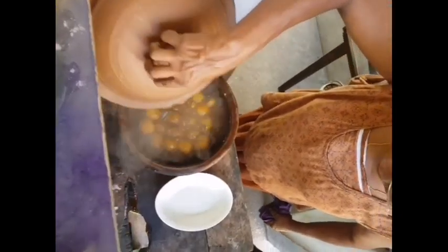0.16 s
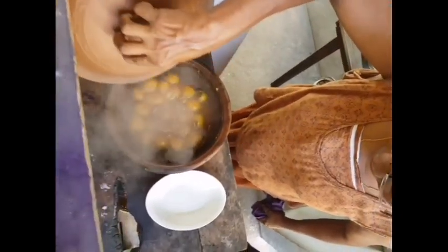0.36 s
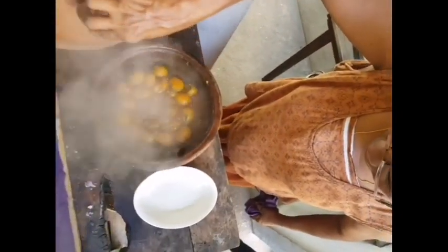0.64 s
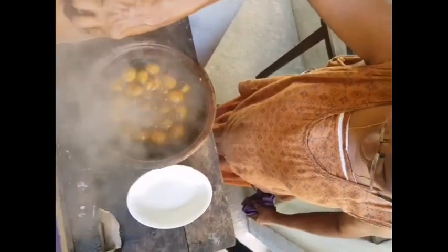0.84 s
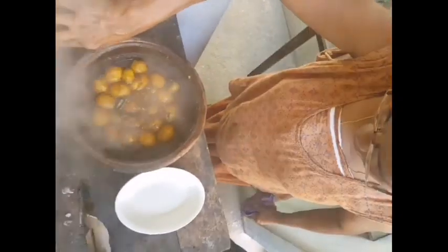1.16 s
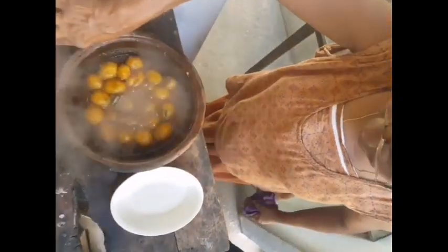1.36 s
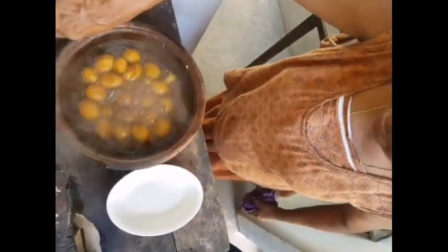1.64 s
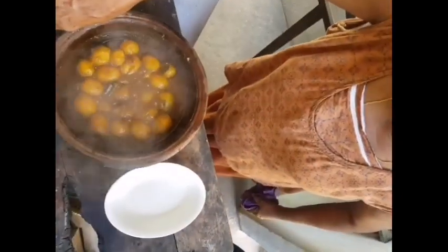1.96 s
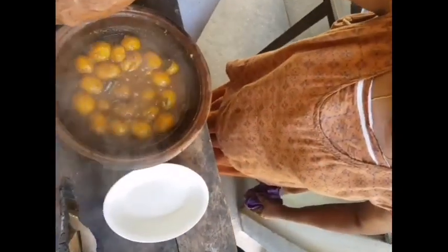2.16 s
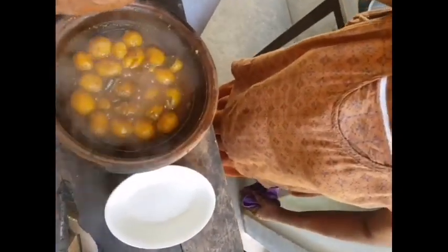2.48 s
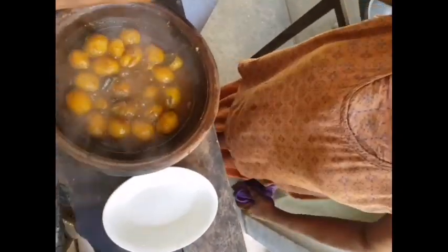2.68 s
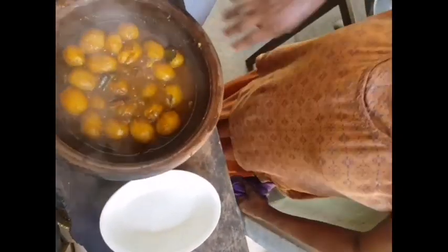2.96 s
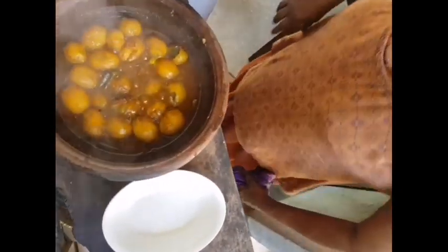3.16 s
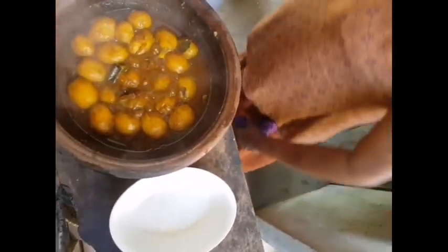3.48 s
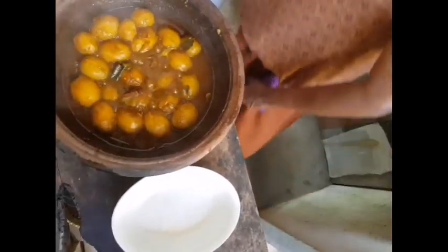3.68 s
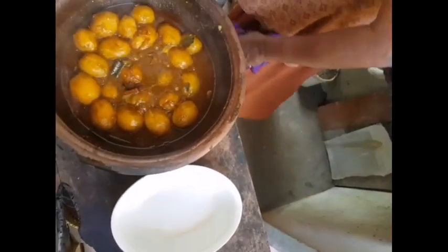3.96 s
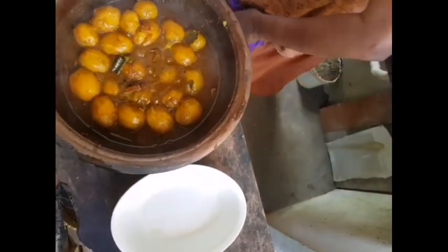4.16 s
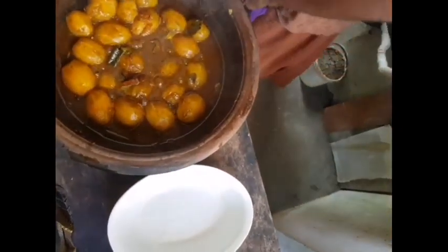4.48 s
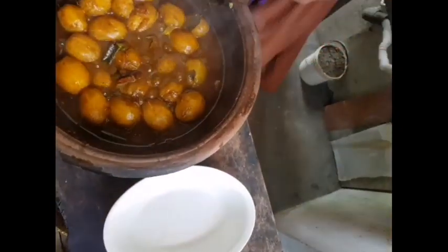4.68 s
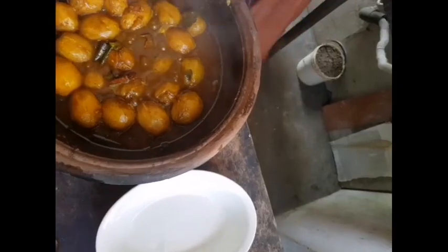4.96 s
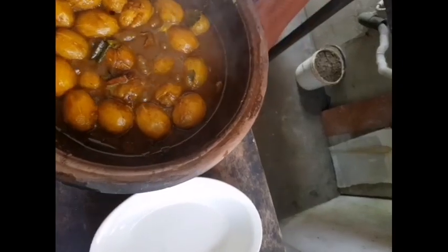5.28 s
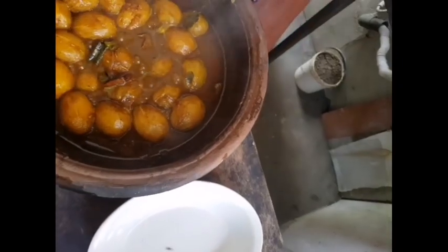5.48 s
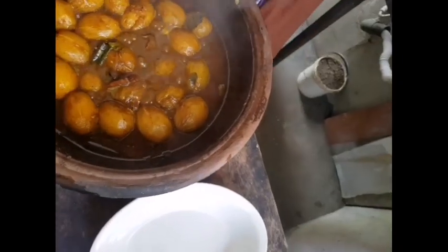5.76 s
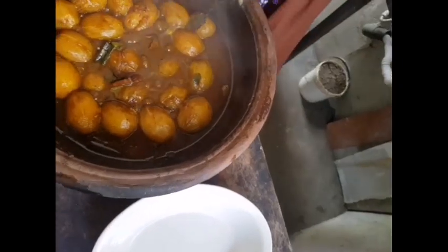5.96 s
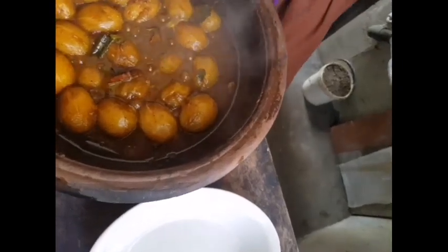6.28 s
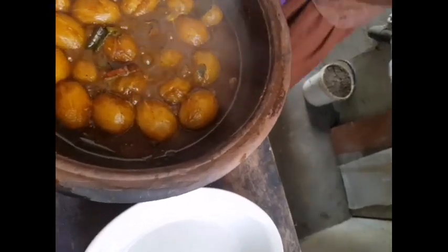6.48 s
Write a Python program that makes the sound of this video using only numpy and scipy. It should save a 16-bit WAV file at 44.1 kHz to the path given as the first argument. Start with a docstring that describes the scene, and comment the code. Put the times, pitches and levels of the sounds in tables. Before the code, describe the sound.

Close stereo beside a pot in an open-sided kitchen, with soft outdoor air and a thin, steady insect drone. Low handling rumble starts and fades; curry fizzes faintly, with small bird whistles at 0.3-0.7 s and grainy hiss swelling. From 0.9 s a heavy clay lid makes quick light knocks, then gritty, juddering drags. A strong hollow knock comes at 1.3 s, lesser ones at 1.5 and 1.6 s, a growing scrape near 1.9 s, and the loudest, deepest flat thud at 2.1 s, with a small afterknock at 2.3 s. Then it is quiet: fine ticking, soft glugs and brief dry rubs, notably at 4.3 and 5.6 s. Hoarse, echoing crows caw at 2.4, 3.0 and 5.9 s; a falling whistle sounds at 3.7 s, more small birds at 4.7-5.6 s. Spits grow crisp and frequent from 4.8 s, sharpest around 5.8-6.6 s, with a plop near the end.

```python
"""Clay lid and simmering curry

An open-sided kitchen, stereo, close on the pot: its clay lid comes off and is set down on a ledge. Decaying
modes and noise make the knocks, juddering noise the drags; a heavy blow drops the lid flat, with one light
knock after it. The curry is fizzing noise, short spitting bursts and sines of rising pitch; brushes pass as
bands of noise. Outside, hoarse harmonic crows and smaller, buzzing whistles sound over shaped noise: air and
insects."""
import sys
import numpy as np
from scipy import signal
from scipy.fft import rfft, irfft
from scipy.io import wavfile

SR = 44100
rng = np.random.default_rng(int(sys.argv[2]) if len(sys.argv) > 2 else 0)


def store_pcm(level_fs):
    """Save levels as 16-bit WAV."""
    pcm = np.round(np.clip(level_fs, -1, 1) * 32767).astype(np.int16)
    wavfile.write(sys.argv[1], SR, np.atleast_2d(pcm).T)


N = 291942
TIME = np.arange(N) / SR
BINS = np.maximum(np.fft.rfftfreq(N, 1 / SR), 1)

# Lid knocking on the ledge: (time [s], level [dB], then relative to it: lid's boom [dB],
# deep bass [dB], clay ring [dB], gritty crack [dB])
LID_KNOCKS = [(0.891, -24.5, -0.5, -27, -15, -37), (0.943, -23.5, 2, -33, -18, -25),
              (1.054, -32.5, 3.5, -32, -26, -17), (1.11, -35.5, 3.5, -39, -11, -30),
              (1.296, -11, -9, -17, -21.5, -18.5), (1.523, -21, -18, -11, -21.5, -23),
              (1.642, -24, -12, -10, -26, -36.5), (2.097, -5, -4.5, -6, -2, -35),
              (2.337, -29.5, -11, -9.5, -20, -15)]
# Modes of the ledge under the lid: (frequency [Hz], level [dB], t60 [s])
LEDGE_MODES = [(78, -8.5, 0.29), (108.5, 4, 0.12), (145, -7, 0.2), (180, -14, 0.11), (241.6, -3, 0.18),
               (273, 2, 0.084), (356, -7, 0.18), (530, -12.5, 0.05)]
# Modes of the lid's own ring: (frequency [Hz], level [dB], t60 [s])
CLAY_MODES = [(585, -8, .13), (685, -7, .16), (756, -4, .16), (830, -5, .2), (926, -5, .2), (1014, -6, .16),
              (1074, -4, .2), (1167, -3, .17), (1248, -4, .17), (1319, -10, .2), (1417, -1, .17),
              (1471, -4, .16), (1519, -3, .19), (1663, -5, .19), (1900, -3, .14), (2073, -13, .16),
              (2406, -8, .13), (2498, -4, .14), (2755, -8, .1), (3160, -13, .11), (3243, -14, .11)]
# Colour of crushed grit: (frequency [Hz], level [dB])
GRIT_COLOUR = [(450, 1.5), (1500, -16.5), (2100, 2.5), (2500, 6.5), (2800, -5), (3100, 9), (3400, -5),
               (3700, 5.5), (4400, -3), (6000, -5.5), (7500, -22), (10000, -19), (15000, -26)]
# Colour of the lid's dull rattle: (frequency [Hz], level [dB])
CLAY_COLOUR = [(300, -3.5), (480, -10), (620, 1), (900, -1), (1150, 7), (1550, -5), (1800, -1.5),
               (2000, -10), (2200, -12), (2500, -17), (2800, -15), (3100, -20), (3700, -24), (7000, -43)]
# Colour of the shaken ledge: (frequency [Hz], level [dB])
RUMBLE_COLOUR = [(30, -21), (95, -7), (135, -8), (185, -1.5), (210, -1), (235, -2.5), (350, -7.5),
                 (460, -16), (900, -32), (4000, -82)]
# Lid sliding between knocks: (start [s], length [s], grit level [dB], clay body level [dB],
# rumble level [dB], growth from start to end [dB])
LID_SLIDES = [(0.891, 0.42, -58, -51.5, -49.5, 7), (1.308, 0.443, -64.5, -57.5, -45, 1),
              (1.778, 0.108, -80, -61, -53, 6), (1.898, 0.119, -51, -54, -40.5, 11),
              (2.021, 0.071, -40.5, -48, -33, -4.5)]
# Colour of fizz and hiss: (frequency [Hz], level [dB])
FIZZ_COLOUR = [(1000, -18.5), (3000, -4.5), (5000, -5), (7200, -6), (8700, 0), (11000, -4), (13500, -9),
               (16000, -27)]
# Loudest bubbles spitting: (time [s], level [dB])
CURRY_SPITS = [(0.138, -43.5), (0.839, -47), (1.6762, -40), (2.7576, -51), (3.217, -46), (4.75, -45),
               (4.916, -46), (5.0558, -44.5), (5.1637, -45.5), (5.276, -46.5), (5.375, -42),
               (5.8312, -35.5), (6.0173, -36), (6.1873, -42), (6.3225, -40), (6.3924, -33.5),
               (6.573, -36.5)]
# Thick bubbles and light taps: (time [s], level [dB], pitch [Hz])
CURRY_PLOPS = [(2.681, -41, 1750), (3.819, -45, 2930), (4.591, -44, 1080), (4.628, -47, 1170),
               (5.05, -46, 457), (5.171, -43, 960), (5.409, -43, 800), (5.439, -46, 1000),
               (6.56, -37, 1980)]
# Bright hiss swells: (time of the top [s], level [dB], time per 20 dB [s]);
# a positive time is that of the sinking, a negative one that of the rise
HISS_SWELLS = [(0.55, -57.5, 0.08), (0.735, -58, 0.25), (1.29, -50, -0.02), (1.54, -55, 0.13),
               (1.77, -48.5, 0.22), (2.503, -48.5, 0.09), (4.075, -59.5, -0.38)]
# Brushes and scuffs: (time [s], length [s], rub level [dB], rub centre [Hz], rub width [octaves],
# dull body level [dB], hiss level [dB])
CLOTH_SCUFFS = [(1.708, 0.13, -52.5, 2950, .26, -70, -68), (2.336, 0.084, -55.5, 3840, 1.3, -60, -62),
                (2.864, 0.093, -56.5, 3570, 0.62, -74, -59.5), (3.379, 0.32, -63, 2420, 1.0, -63, -60),
                (3.878, 0.1, -59.5, 4000, 0.92, -67, -67), (4.06, 0.073, -52, 2400, 1.5, -56, -63),
                (4.337, 0.048, -46, 4500, 0.2, -48.5, -48.5), (4.39, 0.16, -53.5, 3880, 0.96, -57, -56.5),
                (5.519, .089, -54.5, 1750, 1.4, -68, -60.5), (5.649, 0.066, -45, 2480, 0.52, -46.5, -84),
                (6.406, 0.032, -53.5, 2830, 0.97, -67, -68), (6.557, 0.03, -46, 2220, .42, -65, -74)]
# Crows: (time [s], length [s], level [dB], top pitch [Hz])
CROW_CAWS = [(2.417, 0.3, -43, 701), (3.01, 0.25, -44, 673.6), (5.869, 0.3016, -44, 657.4)]
# Overtones of a caw: (multiple of the pitch [1], level [dB])
CROW_PARTIALS = [(1, -2), (2, -12.5), (3, -19.5), (4, -29.5)]
# Smaller birds: (time [s], length [s], level [dB], top pitch [Hz], last pitch [Hz], buzz depth [rad])
BIRD_CALLS = [(0.339, 0.17, -55.5, 1784, 1662, 1.3), (0.507, 0.086, -60, 1293, 1170, 0.16),
              (0.714, 0.15, -59, 1297, 1310, 0.3), (3.743, 0.35, -51.5, 1959, 1608, 0.27),
              (3.771, .28, -62.5, 1425, 1270, 0.66), (4.676, 0.26, -61.5, 1898, 1620, 0.99),
              (5.298, 0.128, -57.5, 2940, 2945, 1.44), (5.3, 0.16, -60.5, 557, 509, 0.13),
              (5.569, 0.22, -55, 2377, 2223, 1.2)]
# Colour of the outdoor air: (frequency [Hz], level [dB])
AIR_COLOUR = [(15, -5), (30, -5), (80, 2), (160, 0), (300, -7.5), (450, -9.5), (650, -7), (1050, -9.5),
              (1350, -16), (1900, -17.5), (2500, -43), (3300, -38), (6600, -79)]
# Colour of the insect drone: (frequency [Hz], level [dB])
INSECT_COLOUR = [(300, -38), (2600, -2.5), (3400, -3.5), (4050, 8.5), (4600, 2), (5200, 0), (5520, 12),
                 (5800, 3.5), (6200, 1.5), (6700, -9), (9000, -18), (12500, -13.5), (16000, -14)]
# Left-right likeness of the surroundings: (frequency [Hz], correlation [-1 to 1])
WIDE_LIKENESS = [(100, .97), (300, 0.71), (700, 0.35), (2000, 0), (4000, 0.3), (5600, 0.83), (7500, 0.053),
                 (15000, 0)]
# Left-right likeness of close sounds: (frequency [Hz], correlation [-1 to 1])
CLOSE_LIKENESS = [(100, .99), (350, 0.91), (700, 0.35), (1200, -0.7), (2500, -0.063), (5000, 0.15),
                  (9000, 0.0089)]
# Lead of the left ear for the lid and ledge: (frequency [Hz], phase [rad])
LEFT_LEAD = [(100, .06), (350, 0.18), (700, 0.17), (1200, 1.25), (2500, 1.8)]
# Colour difference of the two microphones: (frequency [Hz], left over right [dB])
MICROPHONE_BALANCE = [(60, 2), (280, 4), (600, -.7), (1200, 0.8), (7000, -0.5), (8800, 7), (10500, 4.5),
                      (12500, 2)]

# The boom sinks in pitch as more of the lid rests on the ledge
BOOM_HZ, BOOM_SAG_HZ_PER_S, BOOM_T60_S = 213.7, 15.9, 0.27
SLIDE_ATTACK_S, SLIDE_RELEASE_T60_S = 0.0078, 0.094
SIMMER_DB = -72.5
# The biggest spits also snap across the treble, at SNAP_DB for a spit of SNAP_FROM_DB
SNAP_FROM_DB, SNAP_DB, SNAP_DB_PER_DB, SNAP_T60_S = -33.5, -36, 2.8, .008
# The puff of steam that a thick bubble lets go
PUFF_DB, PUFF_OCTAVES, PUFF_T60_S = -14, 0.42, .07
SWELL_OTHER_SIDE = 0.86   # time per 20 dB on a swell's other side, over the listed one
SCUFF_BODY_HZ, SCUFF_BODY_OCTAVES = 645, 1.5
# First and last pitch over top pitch; attack as share of the length
CAW_START, CAW_END, CAW_ATTACK = .89, 0.94, 0.39
BIRD_START, BIRD_ATTACK = 0.97, 0.22
# Low handling noise as the lid is lifted: it holds, then dies away
HANDLING_DB, HANDLING_HOLD_S, HANDLING_T60_S = -51, .16, 2.2
CUTOFF_HZ = 15700


def knocks(thump_db=-8, clay_db=-14, thud_db=-9, thud_t60=0.24, crack_db=-3, crack_t60=0.13,
           shudder_db=-14, shudder_t60=0.39, rim_delay=.003):
    """The ledge thumps first; a moment later the rim lands, rattles, rings and crushes grit."""
    out, t = np.zeros((2, N)), TIME[:SR // 2]
    grit = noise(GRIT_COLOUR, CLOSE_LIKENESS)
    rattle = noise(CLAY_COLOUR, CLOSE_LIKENESS)
    shudder = noise(RUMBLE_COLOUR, CLOSE_LIKENESS)
    for s, db, boom, weight, clay, crack in LID_KNOCKS:
        boom_hz = BOOM_HZ - BOOM_SAG_HZ_PER_S * (s - LID_KNOCKS[0][0])
        here = slice(int(s * SR), int(s * SR) + len(t))
        # only a heavy blow moves the deepest modes
        body = [(hz, level + (weight + 6) * (hz < 140), t60) for hz, level, t60 in LEDGE_MODES]
        modes = [(boom_hz, boom, BOOM_T60_S)] + body
        thump = amp(thump_db) * ring(modes, uneven_db=1.0) * (1 - fade(t, 0.0019))
        thump += amp(shudder_db) * shudder[:, here] * fade(t, shudder_t60) * (1 - fade(t, 0.0096))
        rim = amp(clay + clay_db) * ring(CLAY_MODES, uneven_db=2) * (1 - fade(t, .015))
        rim += amp(clay + thud_db) * rattle[:, here] * fade(t, thud_t60)
        rim += amp(crack + crack_db) * grit[:, here] * fade(t, crack_t60)
        add(out, s, amp(db) * thump)
        add(out, s + rim_delay, amp(db) * rim)
    # a small ledge radiates no sub-bass
    out = signal.sosfilt(signal.butter(3, 50, "high", fs=SR, output="sos"), out)
    return echoes(out, t60=0.38, wet_db=-14.0, likeness=CLOSE_LIKENESS)


def drag(grit_db=4, body_db=-2, sing_db=-1, rumble_db=-2, hiss_db=-3, judder_db=1.85):
    """Unglazed clay catches and slips over the ledge, shaking both, as the push grows or eases."""
    grit, body, rumble = np.zeros((3, N))
    for s, length, grit_level, body_level, rumble_level, growth in LID_SLIDES:
        progress = np.clip((TIME - s) / length, 0, 1)
        push = amp(growth * (progress - .5)) * hold(s, length, SLIDE_ATTACK_S, SLIDE_RELEASE_T60_S)
        grit += amp(grit_level) * push
        body += amp(body_level) * push
        rumble += amp(rumble_level) * push
    # the slips keep the lid's upper modes singing, damped by the hand
    upper_modes = [mode for mode in CLAY_MODES if mode[0] > 1100]
    upper = ring(upper_modes, uneven_db=2) * fade(TIME[:SR // 2], .12)
    slips = rng.standard_normal((1, N))
    sing = unit(signal.fftconvolve(slips, np.diff(upper), axes=1)[:, :N])
    scrape = amp(grit_db) * noise(GRIT_COLOUR, CLOSE_LIKENESS, spiky_db=1.0)
    scrape += amp(hiss_db) * noise(FIZZ_COLOUR, CLOSE_LIKENESS, spiky_db=2.5)
    clay = amp(body_db) * noise(CLAY_COLOUR, CLOSE_LIKENESS, spiky_db=2.5) + amp(sing_db) * sing
    shaking = amp(rumble_db) * noise(RUMBLE_COLOUR, CLOSE_LIKENESS)
    return (grit * scrape + body * clay + rumble * shaking) * amp(judder_db * drift(110))


def curry(spit_db=-3, spit_t60=0.013, spray_db=-23, spray_t60=0.15, tick_db=-60, tick_spread_db=10,
          plop_db=-4, plop_t60=0.023, glug_db=-57, tick_count=170, glug_count=70):
    """Tiny bursts fizz and tick, larger ones spit and leave a short spray, and thick bubbles glug."""
    out, t = np.zeros((2, N)), TIME[:SR // 8]
    spray = noise(FIZZ_COLOUR, CLOSE_LIKENESS)
    burst = fade(t, spit_t60) + amp(spray_db) * fade(t, spray_t60)
    bursts = [(s, db + spit_db) for s, db in CURRY_SPITS]
    # ticks come more often as the microphone nears the pot
    for when, size in rng.random((tick_count, 2)):
        tick_time = np.interp(when ** .8, [0, 1], [.45, N / SR])
        bursts.append((tick_time, tick_db + tick_spread_db * size ** 2))
    for s, db in bursts:
        start = rng.integers(N - len(t))
        add(out, s, amp(db) * spray[:, start:start + len(t)] * burst)
    for s, db in CURRY_SPITS:
        snap = amp(SNAP_DB + SNAP_DB_PER_DB * (db - SNAP_FROM_DB)) * rub(12400, 0.97)[:, :len(t)]
        add(out, s, snap * fade(t, SNAP_T60_S))
    for s, db, hz in CURRY_PLOPS:
        puff = rub(hz, PUFF_OCTAVES)[:, :len(t)] * fade(t, PUFF_T60_S)
        add(out, s, amp(db + PUFF_DB) * puff)
        # each sheds a quieter companion, close in pitch
        pair = bubble(hz, plop_t60) + 0.19 * bubble(0.99 * hz, plop_t60)
        add(out, s, amp(db + plop_db) * pair)
    # glugs are heard once the microphone leans in over the pot
    for when, size, pitch in rng.random((glug_count, 3)):
        glug_time = np.interp(when, [0, 1], [2.4, N / SR])
        glug = bubble(330 * 4.5 ** pitch, .05)
        add(out, glug_time, amp(glug_db + 8 * (size - .5)) * glug)
    fizz = amp(SIMMER_DB + 2.7 * drift(17)) * noise(FIZZ_COLOUR, CLOSE_LIKENESS, spiky_db=2.5)
    return fizz + echoes(out, t60=0.22, wet_db=-6.0, likeness=CLOSE_LIKENESS)


def bubble(hz, t60, rise=5.1):
    """A bubble rings with a rising pitch as it surfaces; rise is the share of hz gained per second."""
    t = TIME[:SR // 8]
    return np.sin(2 * np.pi * hz * t * (1 + rise * t / 2)) * fade(t, t60) * (1 - fade(t, 0.0016))


def hiss_swells(hiss_db=-1):
    """A bright, grainy hiss close by rises to a point and sinks again, linearly in dB."""
    level = 0
    for s, db, sink in HISS_SWELLS:
        away = np.maximum((TIME - s) / sink, (s - TIME) / (sink * SWELL_OTHER_SIDE))
        level = level + amp(db - 20 * np.minimum(away, 10))
    return amp(hiss_db) * level * noise(FIZZ_COLOUR, CLOSE_LIKENESS, spiky_db=2.0)


def scuffs(hiss_db=-1):
    """Short rubs with a dull body below and a hiss on top, swelling fast and dying away."""
    out, t = np.zeros((2, N)), TIME[:SR // 2]
    hiss = noise(FIZZ_COLOUR, CLOSE_LIKENESS, spiky_db=2.0)
    for s, length, db, hz, width, body, top in CLOTH_SCUFFS:
        start, u = rng.integers(N - len(t)), t / length
        sound = amp(db) * rub(hz, width) + amp(body) * rub(SCUFF_BODY_HZ, SCUFF_BODY_OCTAVES)
        sound += amp(top + hiss_db) * hiss[:, start:start + len(t)]
        add(out, s, sound * np.minimum(9 * u, 1) / (1 + u ** 4) * fade(u, 20.0))
    return out


def crows(rasp_db=-5.5, flutter_db=2.0, jitter=.042):
    """Hoarse caws: jittered harmonics and a noisy rasp, smeared by the yard."""
    out = np.zeros((2, N))
    # (frequency [Hz], level [dB])
    rasp_colour = [(350, -20), (560, 4), (780, -1.0), (900, -3.0), (1300, 0.0), (1600, -10),
                   (2000, -7.5), (2600, -17.0), (4500, -39)]
    rasp = noise(rasp_colour, CLOSE_LIKENESS)
    for s, length, db, hz in CROW_CAWS:
        pitch, swell = call(length, CAW_START * hz, hz, CAW_END * hz, CAW_ATTACK)
        size = len(pitch)
        phase = 2 * np.pi * np.cumsum(pitch * (1 + jitter * drift(449.7, size))) / SR
        # overtones come in only as the beak opens
        partials = [amp(level) * swell ** (k > 1) * np.sin(k * phase) for k, level in CROW_PARTIALS]
        voice = unit(sum(partials))
        hoarse = amp(flutter_db * drift(59.6, size))
        breath = amp(rasp_db) * rasp[:, int(s * SR):int(s * SR) + size]
        add(out, s, amp(db) * swell * hoarse * (voice + breath))
    return echoes(out, t60=1.43, wet_db=-0.5, likeness=[(600, 0.27), (1200, 0.66), (3000, 0.078)])


def birds(buzz_hz=260, jitter=0.0291):
    """Whistles, mostly falling, that a fast phase flutter makes buzz; far off and straight ahead."""
    out = np.zeros((2, N))
    for s, length, db, hz, last_hz, buzz in BIRD_CALLS:
        pitch, swell = call(length, BIRD_START * hz, hz, last_hz, BIRD_ATTACK)
        size = len(pitch)
        flutter = np.sin(2 * np.pi * np.cumsum(buzz_hz * (1 + 0.146 * drift(90.0, size))) / SR)
        phase = 2 * np.pi * np.cumsum(pitch * (1 + jitter * drift(302.7, size))) / SR
        add(out, s, amp(db) * swell * unit(np.sin(phase + buzz * flutter)))
    return echoes(out, t60=0.74, wet_db=0.5, likeness=[(1000, 0.93), (4000, 1.0)])


def call(length, first, top, last, attack):
    """Pitch bend through the top pitch, and loudness swell, of one call."""
    u = np.linspace(0, 1, int(length * SR))
    pitch = np.interp(u, [0, .35, 1], [first, top, last])
    return pitch, np.minimum(u / attack, 1) * np.minimum((1 - u) / 0.25, 1)


def background(air_db=-59.5, insect_db=-62.0):
    """Outdoor air and a steady insect drone as coloured noise, with low handling noise at the start."""
    air = amp(air_db + 0.55 * drift(5.81)) * noise(AIR_COLOUR, WIDE_LIKENESS)
    insects = amp(insect_db + 0.25 * drift(23)) * noise(INSECT_COLOUR, WIDE_LIKENESS)
    # (frequency [Hz], level [dB])
    handling_colour = [(25, -13), (70, 3.5), (100, -6), (150, 3.0), (260, -20.0), (900, -58), (4000, -96)]
    handling = amp(HANDLING_DB) * hold(0, HANDLING_HOLD_S, 0.013, HANDLING_T60_S)
    return air + insects + handling * noise(handling_colour, WIDE_LIKENESS)


def ring(modes, uneven_db):
    """A struck body: decaying sines of alternating sign, the left ear leading in phase."""
    hz, db, t60 = np.transpose(modes)[:, :, None]
    t = TIME[:SR // 2]
    sign = (-1) ** np.arange(1, len(db) + 1)[:, None]
    decay = sign * amp(db + uneven_db * rng.standard_normal(db.shape)) * fade(t, t60)
    lags = (0, at_hz(LEFT_LEAD, hz))
    return np.array([np.sum(decay * np.sin(2 * np.pi * hz * t - lag), 0) for lag in lags])


def rub(hz, octaves):
    """Half a second of stereo noise in one band, rms 1."""
    f = np.maximum(np.fft.rfftfreq(SR // 2, 1 / SR), 1)
    band = 1 / (1 + (np.log2(f / hz) / octaves) ** 2) ** 1.4
    return unit(irfft(rfft(rng.standard_normal((2, SR // 2))) * band))


def noise(spectrum, likeness, spiky_db=0):
    """Coloured stereo noise of rms 1; spiky_db breaks it into grains of uneven size."""
    grains = np.repeat(rng.exponential(1, N // 16 + 1), 16)[:N]   # 16 samples each
    grainy = rng.standard_normal((2, N)) * amp(spiky_db * np.minimum(grains, 6))
    mid, side = rfft(grainy)
    alike = np.clip(at_hz(likeness, BINS), -1, 1)
    pair = np.sqrt(1 + alike) * mid + np.sqrt(1 - alike) * side * [[1], [-1]]
    return unit(irfft(pair * amp(at_hz(spectrum, BINS)), N))


def echoes(x, t60, wet_db, likeness):
    """Direct sound plus a diffuse tail of decaying noise, at about unchanged power."""
    t = TIME[:SR]
    flat = [(20, 0), (20000, 0)]
    tail = noise(flat, likeness)[:, :SR] * fade(t, t60) * (1 - fade(t, .03))
    tail /= np.sqrt(np.sum(tail ** 2) / 2)
    wet = signal.fftconvolve(x, tail, axes=1)[:, :N]
    return (x + amp(wet_db) * wet) / np.sqrt(1 + amp(wet_db) ** 2)


def hold(start, length, attack, release_t60):
    """Envelope over the whole scene: quick attack, hold, exponential release."""
    t = TIME - start
    return np.clip(t / attack, 0, 1) * fade(np.maximum(t - length, 0), release_t60)


def fade(t, t60):
    """Exponential decay, 60 dB in t60."""
    return np.exp(-np.log(1000) * t / t60)


def drift(rate, size=N):
    """Random wander: normal draws of spread 1, rate per second, joined by straight lines."""
    knots = rng.standard_normal(4096)
    return np.interp(np.arange(size) / SR * rate, np.arange(len(knots)), knots)


def amp(db):
    """Decibels to gain."""
    return 10 ** (np.asarray(db) / 20)


def unit(x):
    """Scale to rms 1."""
    return x / np.sqrt(np.mean(x ** 2) + 1e-20)


def at_hz(points, hz):
    """Read a table on a log-frequency axis."""
    f, value = np.transpose(points)
    return np.interp(np.log(hz), np.log(f), value)


def add(out, s, sound):
    """Mix a sound in at time s."""
    i = max(int(s * SR), 0)
    out[:, i:i + sound.shape[-1]] += sound[..., :N - i]


def scene():
    """Lid and pot close by, and the yard around them."""
    close = knocks() + drag() + curry() + hiss_swells() + scuffs()
    return close + crows() + birds() + background()


def record(dry, ceiling=0.41):
    """The two microphones differ in colour; the loudest peaks are rounded and the top is cut."""
    tilt = amp(at_hz(MICROPHONE_BALANCE, BINS) / 2 * np.array([[1], [-1]]))
    rounded = ceiling * np.tanh(irfft(rfft(dry) * tilt, N) / ceiling)
    return signal.sosfilt(signal.ellip(10, .1, 80, CUTOFF_HZ, fs=SR, output="sos"), rounded)


dry = scene()
out = record(dry)
store_pcm(out)
```